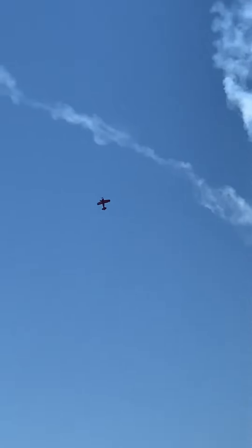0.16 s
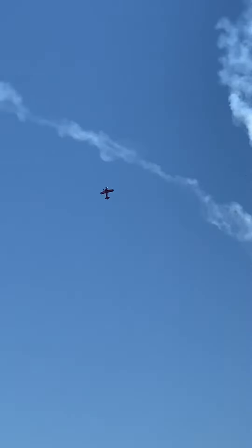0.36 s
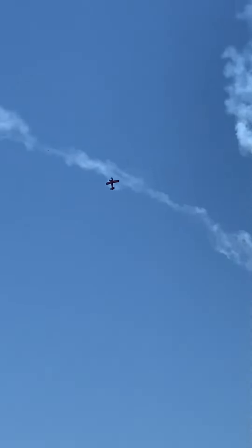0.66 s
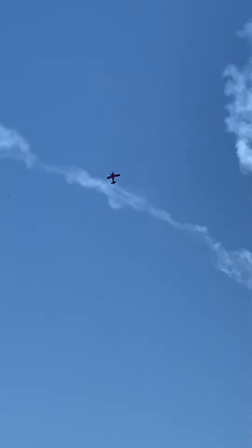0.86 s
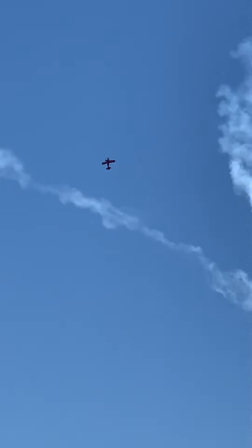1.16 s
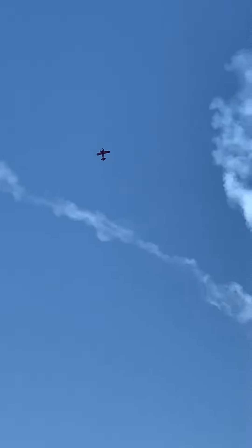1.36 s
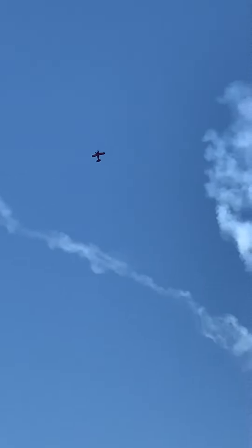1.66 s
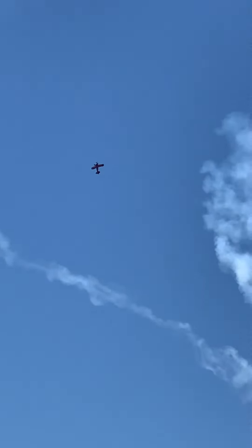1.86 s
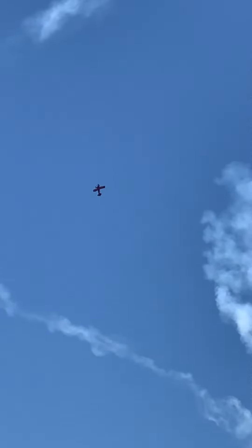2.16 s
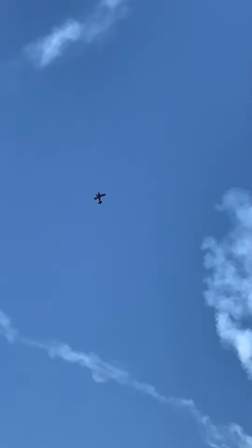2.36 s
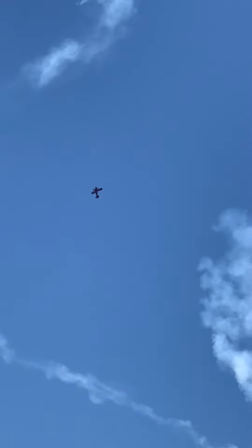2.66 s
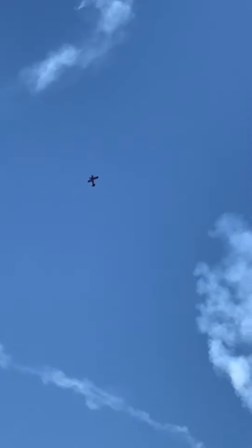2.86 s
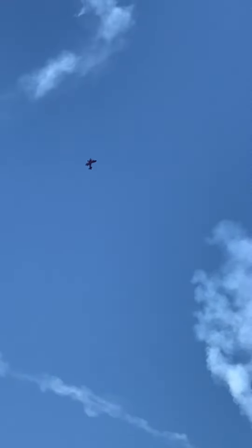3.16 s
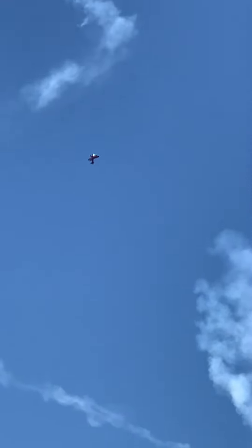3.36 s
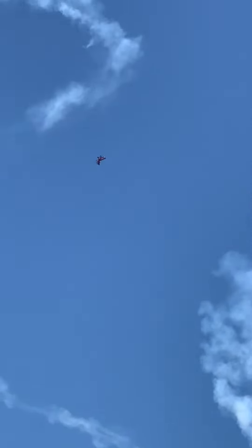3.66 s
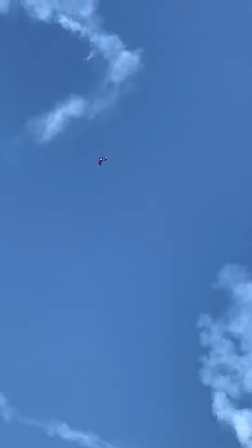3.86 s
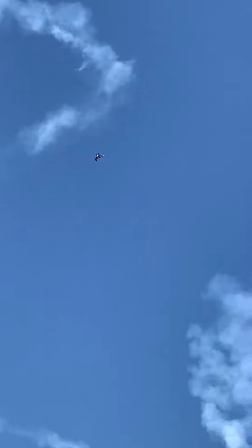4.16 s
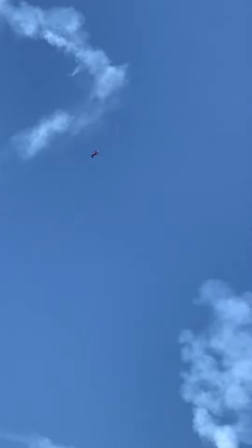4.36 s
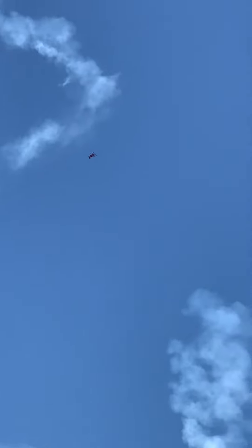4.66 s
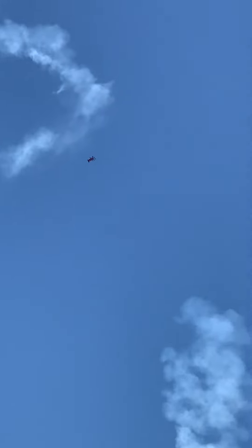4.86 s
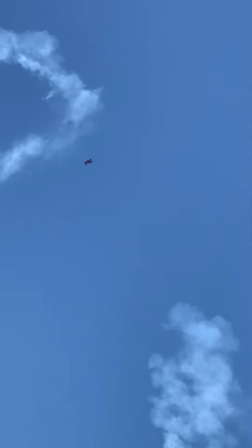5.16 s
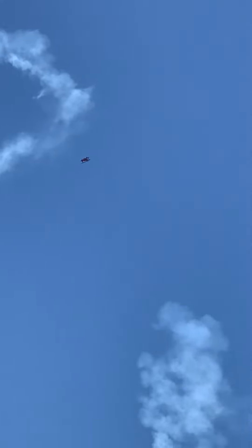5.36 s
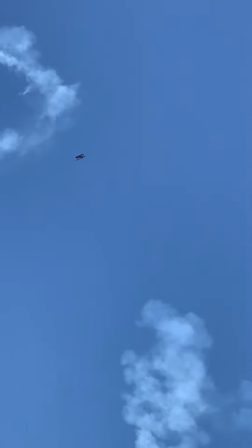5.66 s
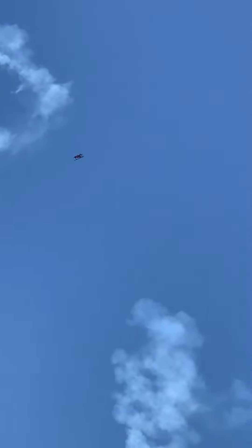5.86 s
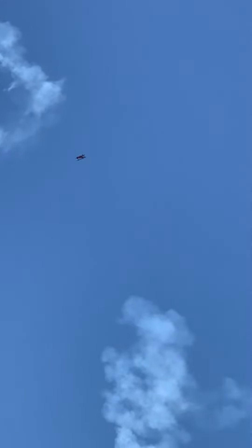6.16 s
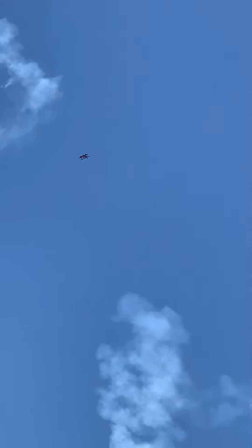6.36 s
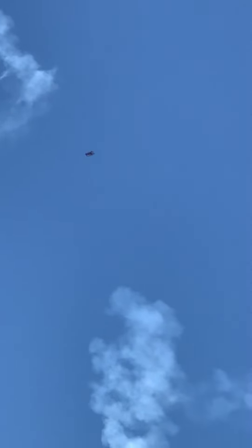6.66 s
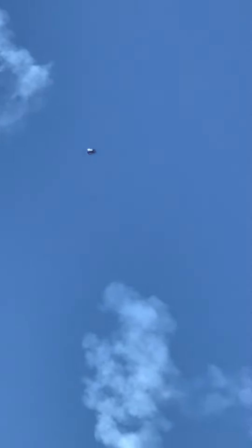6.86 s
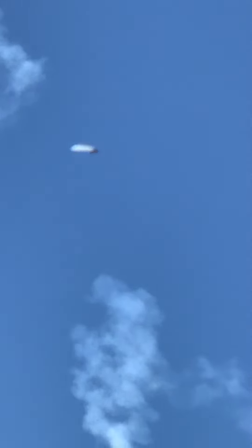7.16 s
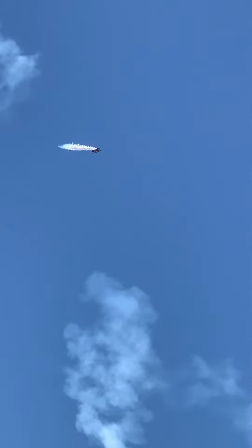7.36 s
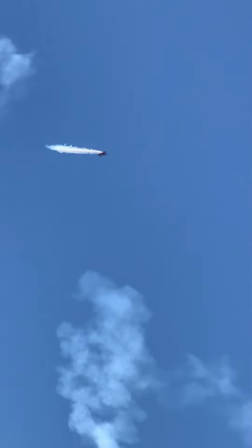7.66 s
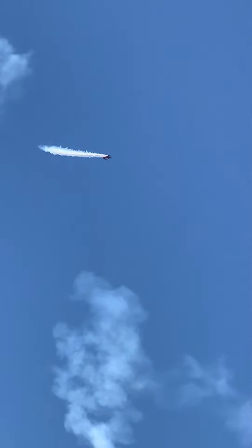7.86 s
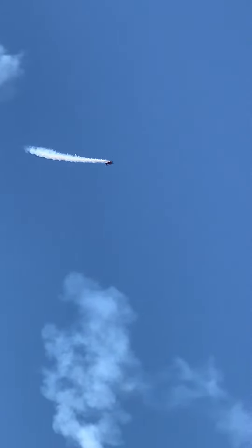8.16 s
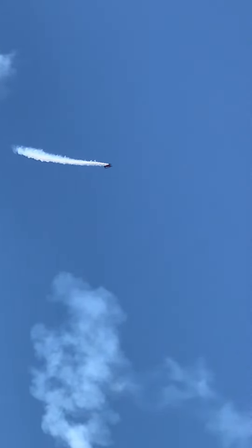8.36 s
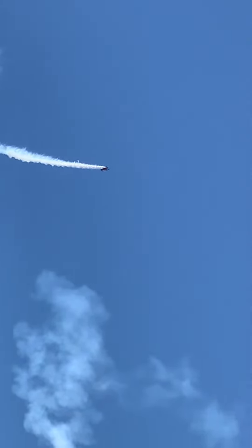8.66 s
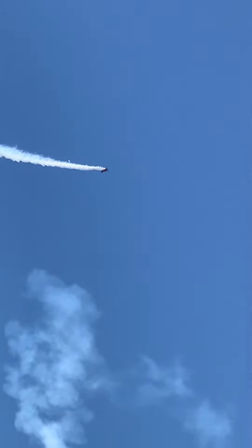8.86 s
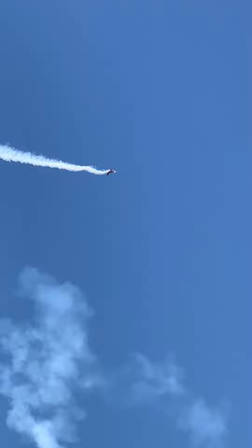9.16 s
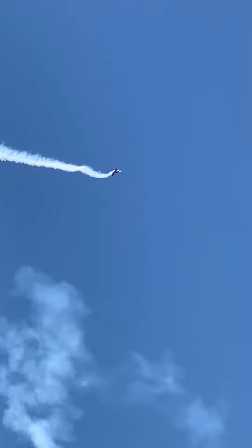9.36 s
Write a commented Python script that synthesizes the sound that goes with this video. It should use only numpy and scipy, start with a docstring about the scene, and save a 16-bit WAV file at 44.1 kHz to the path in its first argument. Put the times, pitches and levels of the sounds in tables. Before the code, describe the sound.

A small propeller plane approaches, swells into a loud rasping, slapping drone overhead, then drops in pitch and recedes into a hollow steady hum.

```python
"""Aerobatic plane flyover

A six-cylinder plane with a three-blade propeller passes overhead, climbs away and turns; its pitch falls.
Propeller: overtones in step, with slaps while the disc points at the listener. Exhaust: uneven cylinders
add a comb of shaft tones. Roar: puffed noise, heard again off the ground. Wind: low rumble on the microphone."""
import sys
import numpy as np
from scipy import signal
from scipy.fft import rfft, irfft, next_fast_len
from scipy.io import wavfile
from scipy.ndimage import uniform_filter1d, minimum_filter1d, map_coordinates

SR = 44100
rng = np.random.default_rng(int(sys.argv[2]) if len(sys.argv) > 2 else 0)


def dump(signal):
    """Clip the signal to [-1, 1] and save it as 16-bit WAV at the path in sys.argv[1]."""
    limited = np.clip(np.atleast_2d(signal).T, -1, 1)
    pcm = np.round(limited * 32767).astype(np.int16)
    wavfile.write(sys.argv[1], SR, pcm)


N = 418950
TIME = np.arange(N) / SR
COARSE = TIME[::128]  # grid for slow gains, s

# Blade rate = firing rate, as heard: t/s, f/Hz
BLADE_RATE = [(0.0, 176.5), (0.7, 167.6), (1.1, 159), (1.5, 149.5), (1.9, 141.4), (2.1, 137.9),
              (2.7, 132.3), (3.6, 130.3), (5.4, 129.5), (6.2, 127.2), (9.5, 128.9)]
# Blade tones, base levels: t/s, 1st/dB, 2nd/dB, 3rd/dB, 4th-7th/dB
BLADE_LEVELS = [(0.0, -44.5, -52, -52.5, -65), (0.65, -30, -36.5, -37.5, -34), (0.9, -26, -21, -36, -23.5),
                (1.2, -18, -32, -29.5, -28.5), (1.4, -15.5, -31, -30.5, -21), (1.7, -21, -18.5, -30, -17),
                (2.0, -21.5, -21, -31.5, -24), (2.2, -26.5, -20, -37.5, -28),
                (2.32, -31.5, -33.5, -26, -34), (2.55, -37, -33.5, -31, -39.5),
                (2.85, -31.5, -29, -36.5, -46.5), (3.3, -54.5, -28, -44, -52),
                (4.0, -62.5, -34, -46, -52.5), (4.25, -65, -28, -43, -40), (4.6, -43, -29, -44, -61),
                (4.9, -40, -26.5, -38, -30), (5.4, -40, -28.5, -45.5, -44),
                (5.75, -32, -41.5, -46.5, -51.5), (6.2, -29.5, -32.5, -66, -56.5),
                (7.0, -27, -36, -42.5, -58), (7.7, -31, -31.5, -55.5, -50), (8.9, -27.5, -34, -66.5, -60),
                (9.2, -37.5, -31, -66, -50.5), (9.5, -34.5, -31.5, -71, -69)]
# Edge of the blade pulses: t/s, base level/dB, slope per tone/dB
SLAP_LEVELS = [(.3, -72.5, -0.3), (.78, -32.5, -2.4), (.87, -25, -1.85), (.98, -39, -0.78),
               (1.15, -26.5, -1.26), (1.23, -35.5, -0.53), (1.3, -24, -1.2), (1.43, -21.5, -0.9),
               (1.59, -22, -1.24), (1.7, -22, -1.07), (1.74, -28.5, -1.5), (1.81, -24.5, -1.56),
               (1.93, -44.5, -1.96), (1.99, -29, -1.82), (2.12, -44, -1.76)]
# Tip crackle spectrum: f/Hz, relative level/dB
TIP_SPECTRUM = [(3000, -22.5), (3800, -7), (5000, -11), (6300, -9), (7800, -22.5), (9500, -47)]
# Treble flares: t/s, rise before shares/dB
TREBLE_FLARES = [(0.871, 20.5), (1.579, 20), (1.7, 3.5), (2.33, 5.5), (3.11, 20), (5.43, 10.5), (6.62, 10)]
# Brief drop-outs around a pitch: t/s, f/Hz, depth/dB, spread/s
DROPOUTS = [(0.824, 160, 7.5, 0.027), (0.997, 464, 8.5, 0.024), (1.07, 320, 21, 0.018),
            (1.917, 520, 23, 0.026), (2.277, 435, 7.5, 0.081), (4.437, 263, 13, 0.11),
            (5.82, 261, 6, 0.057)]
# Tones between blade tones, base levels: t/s, middle/dB, 4/3 of blade rate/dB, high/dB
EXHAUST_LEVELS = [(0.0, -48, -50, -70.5), (.68, -52, -46, -43.5), (1.2, -50.5, -47, -42),
                  (1.7, -38, -37, -42.5), (2.0, -32.5, -33.5, -53.5), (2.5, -40, -51, -43.5),
                  (3.2, -42, -59, -55), (4.0, -49.5, -51.5, -65.5), (4.3, -42.5, -52, -47.5),
                  (5.0, -36.5, -44, -48.5), (5.6, -41, -42.5, -59), (7.0, -32, -39, -52),
                  (7.6, -33.5, -43.5, -54), (8.6, -34, -61.5, -68), (9.5, -38, -60.5, -75)]
# Cylinder inequality; row per blade tone, columns: five sixths below it, relative level/dB
CYLINDER_STEPS = [
    [-33.5, -26, -14.5, -9, -13],
    [-15.5, 1, -2.5, -6, -6],
    [-17, -3.5, -8, -14, -16],
    [-20.5, -1, -7.5, -9.5, -16],
]
# Tones a third of the rate above the 3rd, 4th, .. blade tone: relative level/dB
THIRD_STEPS = [-1, 0, -1, -6, -7, -10]
# Turbulent hiss: t/s, base level/dB
HISS_LEVELS = [(0.0, -53.5), (0.4, -51), (0.7, -38), (1.2, -32), (1.55, -28.5), (1.85, -34.5),
               (2.15, -36.5), (2.45, -37), (3.2, -43.5), (4.1, -44), (4.7, -44), (4.93, -39), (5.27, -43),
               (5.48, -39), (5.9, -43.5), (6.6, -40), (7.1, -41.5), (7.7, -48.5), (8.5, -48.5),
               (9.5, -54.5)]
# Roar body spectrum: f/Hz, relative level/dB
BODY_SPECTRUM = [(35, -42.5), (90, -9), (250, 10), (550, 10.5), (1000, 8.5), (1600, -56)]
# Hiss spectrum: f/Hz, relative level/dB
HISS_SPECTRUM = [(800, -11.5), (1500, -3.5), (2800, -12), (4200, -22), (4900, -40.5), (6800, -48),
                 (9500, -76), (14000, -72.5)]
# Body thins under the hiss: t/s, depth/dB, spread/s
BODY_DIPS = [(1.2, 8, 0.29), (6.2, 7, 0.63)]
# Roar swells around a pitch: t/s, f/Hz, rise/dB, spread/s, spread/Hz
ROAR_SWELLS = [(3.749, 1552, 8, 0.095, 204), (4.95, 1478, 9, 0.17, 239.3), (4.95, 945, 6.5, .12, 102.8),
               (6.5, 988, 9.5, 0.087, 89.4), (7.05, 1930, 9.5, .08, 303), (7.1, 1058, 9, 0.23, 59)]
# Ground echo: t/s, delay/ms, share of direct pressure before HISS_ECHO or TONE_ECHO
GROUND_ECHO = [(0, 1.3, 0.057), (2, 1.83, 0.084), (2.8, 2.75, 0.69), (3.6, 2.9, 0.57), (6.5, 4.28, 0.47),
               (9.5, 4.14, 0.61)]
# Stereo phase: f/Hz, left lead/rad
STEREO_LEAD = [(30, 0), (250, -.6), (520, -1.2), (950, -.8), (1250, 0), (2300, .5), (3250, 2.5),
               (4200, 2.1), (9000, .6)]
# Stereo balance: f/Hz, left minus right/dB
STEREO_LEAN = [(90, .5), (250, -2), (600, -4), (1500, -1.2)]

# Blade tones: fall per upper tone, near AIMED_S (disc points at the listener) and away from it
AIMED_S, AIM_SPREAD_S, DULL_DB, DULL_FAR_DB = 1.46, 0.46, 2, 8
# Slap: offset, level 1 s after the last row (before offset), top edge, phase wander per tone number
SLAP_DB, SLAP_GONE_DB, SLAP_TOP_HZ, SLAP_DRIFT_RAD = -7, -72, 4220, .02
BITE_HZ, BITE_WIDE_HZ, BITE_DB = 3740, 500, 6  # the microphone favours this part of the slap
# Turbulent patches: gain per unit field, full depth from SCATTER_HZ up, delay per bin as a patch climbs
SCATTER_DB, SCATTER_HZ, SCATTER_CLIMB_FRAMES = 7, 2600, .4
RASP_DB = -2.5  # tip noise over the upper slap tones
FLARE_SPREAD_S = .026
FLARE_HISS, FLARE_TOP, FLARE_RASP = 0.28, 0.29, 0.45  # shares of the rise; top adds to hiss
FADE_OCTAVES = 0.59
EXHAUST_LOW_DB, EXHAUST_UPPER_DB, LOW_SHARE = -5, -14.5, .6  # over the middle tones; low swing share
# Odd engine-cycle tones come forward as the exhaust turns to the listener
LOPE_AHEAD_DB, LOPE_BEHIND_DB, TURNED_S = -11.5, -1.5, 0.98
SIXTHS_DB, SIDE_ON_S, SIDE_ON_SPREAD_S = -2, 5.5, 2.8  # sixths heard while the plane is side on
BODY_OVER_HISS_DB = 1
HISS_ECHO, TONE_ECHO = 0.94, 0.95  # soft ground: multipliers of the echo share
BRIGHT_HZ, BRIGHT_GROWS = 2600, 0.19  # hiss above swings wider: air dulls it when the plane is far
LOW_CUT_HZ, TOP_HZ = 24, 14200


def amp(db):
    """Pressure ratio of a level in dB."""
    return 10 ** (np.asarray(db) / 20)


def unit(x):
    """x scaled to rms 1."""
    return x / np.sqrt(np.mean(x ** 2) + 1e-20)


def along(points, hz):
    """Interpolate (Hz, value) points on a log axis."""
    f, v = np.transpose(points)
    return np.interp(np.log(hz + 1), np.log(f + 1), v)


def curves(rows):
    """One value per sample for each column after the time."""
    s, *cols = np.transpose(rows)
    return [np.interp(TIME, s, c) for c in cols]


def wobble(knots_hz):
    """Random curve, straight between normal knots."""
    knots = int(N * knots_hz / SR) + 2
    return np.interp(TIME * knots_hz, np.arange(knots), rng.standard_normal(knots))


def bump(s, spread_s, time=TIME):
    """Bell of height 1 around a moment."""
    return np.exp(-((time - s) / spread_s) ** 2 / 2)


def filtered(x, response):
    """x times a complex response of frequency."""
    size = next_fast_len(N + 8192)
    return irfft(rfft(x, size) * response(np.fft.rfftfreq(size, 1 / SR)), size)[..., :N]


def smooth_field(shape, bins, frames):
    """Random field of rms 1, smoothed over frequency and time."""
    field = uniform_filter1d(rng.standard_normal(shape), size=bins, axis=0)
    return unit(uniform_filter1d(field, size=frames, axis=1))


def swell_db(hz, s):
    """Gain of the roar swells over frequency and time."""
    total = 0
    for at, centre, db, spread_s, spread_hz in ROAR_SWELLS:
        pitch_bell = ((hz[:, None] - centre) / spread_hz) ** 2 / 2
        time_bell = ((s - at) / spread_s) ** 2 / 2
        total = total + db * np.exp(-pitch_bell - time_bell)
    return total


def noise(spectrum, patchy_db, apart, swells=False):
    """Stereo noise of joint rms 1 in random patches; apart weights each side's own noise."""
    hz, s, z = signal.stft(rng.standard_normal((3, N)), SR, nperseg=512)
    gain_db = patchy_db * smooth_field(z.shape[1:], 8, 16)
    gain_db = gain_db + swells * swell_db(hz, s)
    three = signal.istft(z * amp(gain_db), nperseg=512)[1][:, :N]
    stereo = three[0] + apart * three[1:]
    return unit(filtered(stereo, lambda hz: amp(along(spectrum, hz))))


def tone(passages, multiple, db, flicker_db, drift_rad, knots_hz):
    """One multiple of the blade rate; turbulent air shakes its level and phase."""
    level = np.sqrt(2) * amp(db + flicker_db * wobble(knots_hz))
    return level * np.cos(2 * np.pi * multiple * passages + drift_rad * wobble(knots_hz))


def faded_db(multiple):
    """Drop-out gain at one multiple of the firing rate."""
    hz = multiple * np.interp(COARSE, *np.transpose(BLADE_RATE))
    depth_db = 0
    for s, centre, db, spread_s in DROPOUTS:
        near = np.exp(-(np.log2(hz / centre) / FADE_OCTAVES) ** 2)
        depth_db = depth_db + db * bump(s, spread_s, COARSE) * near
    return -np.interp(TIME, COARSE, depth_db)


def ground_db(multiple):
    """The ground echo strengthens or cancels a tone by its phase."""
    s, delay_ms, share = np.transpose(GROUND_ECHO)
    echo = np.clip(TONE_ECHO * np.interp(COARSE, s, share), 0, .95)
    hz = multiple * np.interp(COARSE, *np.transpose(BLADE_RATE))
    cycles = hz * np.interp(COARSE, s, delay_ms) / 1000
    power = 1 + echo ** 2 + 2 * echo * np.cos(2 * np.pi * cycles)
    return np.interp(TIME, COARSE, 10 * np.log10(power))


def flare_db():
    """Brief rises of the treble."""
    return sum(db * bump(s, FLARE_SPREAD_S) for s, db in TREBLE_FLARES)


def slap_level():
    """Slap level and slope per tone; it dies away as the plane leaves."""
    s, db, slope_db = SLAP_LEVELS[-1]
    return curves(SLAP_LEVELS + [(s + 1, SLAP_GONE_DB, slope_db)])


def scattered(x):
    """Turbulent air breaks x into patches that climb in pitch, deeper in the treble."""
    hz, s, z = signal.stft(x, SR, nperseg=512)
    field = smooth_field(z.shape, 5, 9)
    row, frame = np.indices(z.shape)
    field = map_coordinates(field, [row, frame - SCATTER_CLIMB_FRAMES * row], order=1, mode="wrap")
    depth_db = SCATTER_DB * np.minimum(hz / SCATTER_HZ, 1)[:, None] ** 2
    return signal.istft(z * amp(depth_db * np.minimum(field, .5)), nperseg=512)[1][:N]


def slap_response(hz):
    """Microphone emphasis and upper edge of the slap."""
    bite_db = BITE_DB * np.exp(-((hz - BITE_HZ) / BITE_WIDE_HZ) ** 2)
    return amp(bite_db) / (1 + (hz / SLAP_TOP_HZ) ** 20)


def propeller(passages):
    """Each blade passage is a sharp pressure pulse: overtones in step, plus tip noise."""
    *low_db, middle_db = curves(BLADE_LEVELS)
    slap_db, slope_db = slap_level()
    slap_db = slap_db + SLAP_DB + 1.2 * wobble(40)
    dull_db = DULL_FAR_DB + (DULL_DB - DULL_FAR_DB) * bump(AIMED_S, AIM_SPREAD_S)

    early = passages + .1  # pressure builds up ahead of the edge
    low = sum(tone(early, k, db + faded_db(k), flicker_db=1.36, drift_rad=.053, knots_hz=20)
              for k, db in enumerate(low_db, 1))

    late = passages - .1  # trough follows the edge
    middle = 0
    for k in range(4):
        db = middle_db - dull_db * k + faded_db(4 + k) - 1
        middle = middle - tone(late, 4 + k, db, flicker_db=2.6, drift_rad=.35, knots_hz=16)

    slap = sum(tone(passages, k, slap_db + slope_db * (k - 8), flicker_db=2.5,
                    drift_rad=SLAP_DRIFT_RAD * k, knots_hz=24) for k in range(8, 31))
    slap = filtered(scattered(slap), slap_response)

    bunching = unit(np.cos(np.pi * passages) ** 16 + .15)  # tip noise peaks at each passage
    tip_db = slap_db + 14.5 * slope_db + RASP_DB + FLARE_RASP * flare_db()
    tips = amp(tip_db) * bunching * noise(TIP_SPECTRUM, patchy_db=4.5, apart=.6)
    return low + middle + slap + tips


def exhaust(passages):
    """Unequal cylinders repeat every six firings, filling in sixths of the firing rate."""
    middle_db, third_db, high_db = curves(EXHAUST_LEVELS)
    mean_db = middle_db.mean()
    low_db = mean_db + EXHAUST_LOW_DB + LOW_SHARE * (middle_db - mean_db)
    odd_db = np.interp(TIME, [0, TURNED_S], [LOPE_AHEAD_DB, LOPE_BEHIND_DB])
    row_levels = [low_db, low_db, middle_db, middle_db + EXHAUST_UPPER_DB]

    comb = 0
    for below, (row_db, steps) in enumerate(zip(row_levels, CYLINDER_STEPS)):
        row_db = row_db + faded_db(below + .5)
        for k, step_db in enumerate(steps):
            multiple = below + (k + 1) / (len(steps) + 1)
            if (below, k) == (1, 1):  # 4/3 of the blade rate
                level_db = third_db
            else:
                level_db = row_db + ground_db(multiple) + odd_db * (k % 2 == 0)
            comb = comb + tone(passages + rng.random(), multiple, level_db + step_db,
                               flicker_db=.6 + .9 * below, drift_rad=.2 + .22 * below, knots_hz=7)

    thirds = sum(tone(passages + rng.random(), 3 + k + 1 / 3, high_db + db,
                      flicker_db=2.5, drift_rad=.3, knots_hz=8) for k, db in enumerate(THIRD_STEPS))
    sixths = sum(tone(passages + rng.random(), k - 1 / 6, high_db + SIXTHS_DB,
                      flicker_db=3, drift_rad=.4, knots_hz=7) for k in (4, 5))
    return comb + thirds + bump(SIDE_ON_S, SIDE_ON_SPREAD_S) * sixths


def roar(passages):
    """Turbulence behind propeller and exhaust, puffed per firing and echoed by soft ground."""
    hiss_db, = curves(HISS_LEVELS)
    dips_db = sum(db * bump(s, spread_s) for s, db, spread_s in BODY_DIPS)
    body_db = hiss_db + BODY_OVER_HISS_DB - dips_db
    puff = 1 + .15 * np.cos(2 * np.pi * passages) + .15 * np.cos(2 * np.pi * passages / 3)
    gust_db = .6 * wobble(11)
    body = puff * amp(body_db + gust_db) * noise(BODY_SPECTRUM, patchy_db=1.6, apart=.2, swells=True)

    air = noise(HISS_SPECTRUM, patchy_db=2.5, apart=.68, swells=True)
    top = filtered(air, lambda hz: 1 / (1 + (BRIGHT_HZ / (hz + 1)) ** 4))
    top_db = BRIGHT_GROWS * (hiss_db - hiss_db.mean()) + FLARE_TOP * flare_db()
    hiss_gain = amp(hiss_db + gust_db + FLARE_HISS * flare_db())
    hiss = puff * hiss_gain * (air - top + amp(top_db) * top)

    delay_ms, share = curves(GROUND_ECHO)
    later = TIME - delay_ms / 1000
    echo = np.array([np.interp(later, TIME, side) for side in body + HISS_ECHO * hiss])
    return body + hiss + share * echo


def wind():
    """Lumpy low rumble of air moving over the microphone."""
    spectrum = [(22, -50), (45, -12.5), (90, -3.5), (200, -14.5), (400, -69.0)]  # f/Hz, relative level/dB
    return amp(-43.5 + 1.6 * wobble(6.0)) * noise(spectrum, patchy_db=.6, apart=.3)


def scene():
    """Plane with its stereo balance and phase, plus wind."""
    passages = np.cumsum(curves(BLADE_RATE)[0]) / SR  # blade passages so far
    plane = propeller(passages) + exhaust(passages) + roar(passages)
    sides = np.array([[.5], [-.5]])

    def stereo(hz):
        """Level and phase split evenly between the sides."""
        return amp(sides * along(STEREO_LEAN, hz)) * np.exp(1j * sides * along(STEREO_LEAD, hz))

    return filtered(plane, stereo) + wind()


def record(dry):
    """Look-ahead limiter, then a bass cut and a sharp band limit."""
    needed = np.minimum(1, .92 / (np.abs(dry).max(axis=0) + 1e-9))
    gain = uniform_filter1d(minimum_filter1d(needed, size=1323), size=661)
    return filtered(dry * gain, lambda hz: (hz < TOP_HZ) / (1 + (LOW_CUT_HZ / (hz + 1)) ** 4))


dry = scene()
out = record(dry)
dump(out)
```